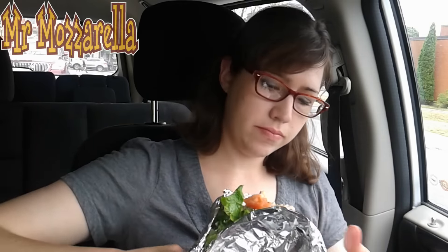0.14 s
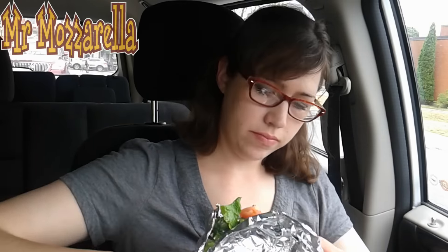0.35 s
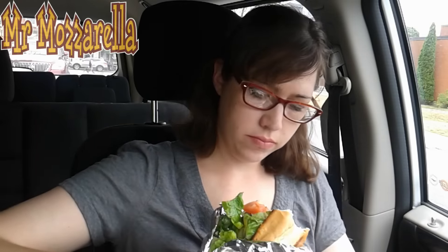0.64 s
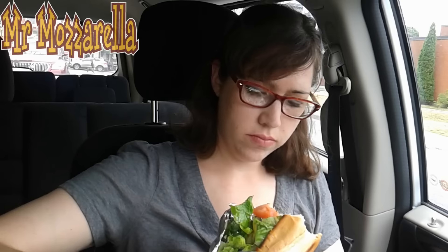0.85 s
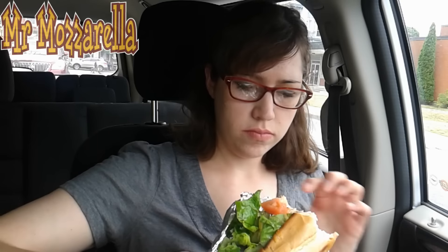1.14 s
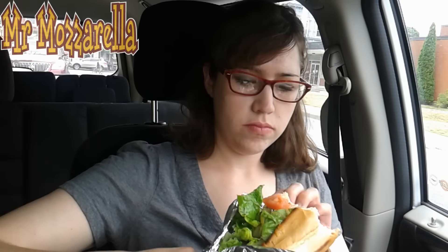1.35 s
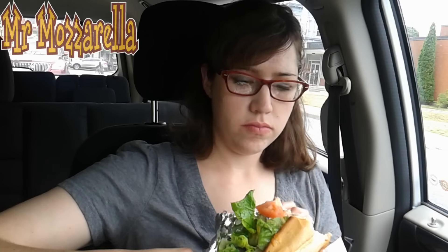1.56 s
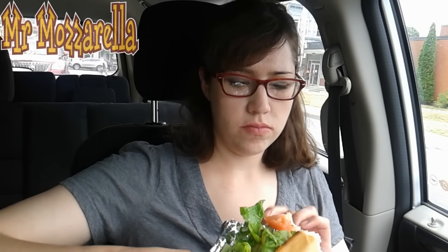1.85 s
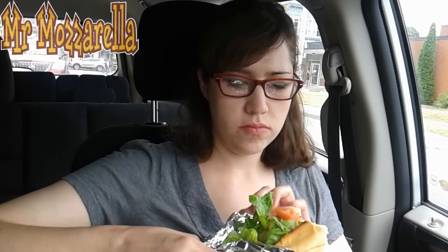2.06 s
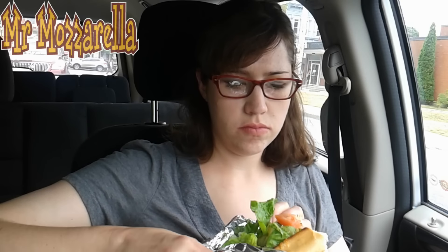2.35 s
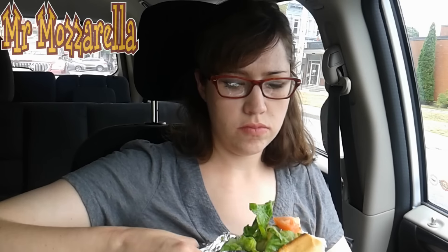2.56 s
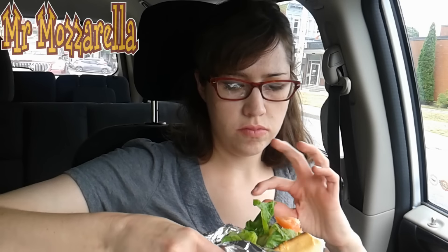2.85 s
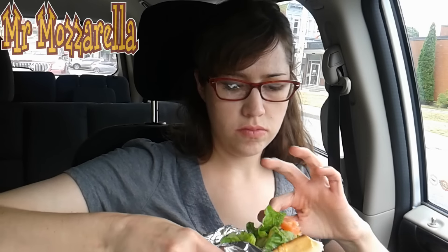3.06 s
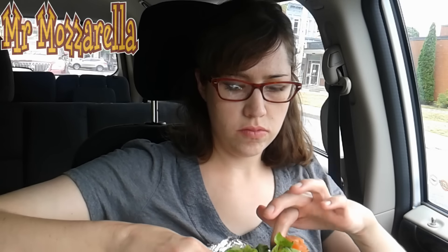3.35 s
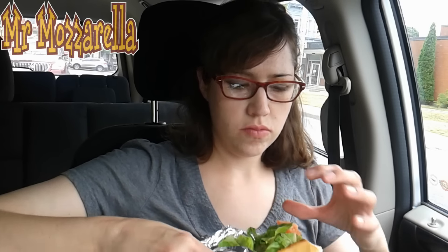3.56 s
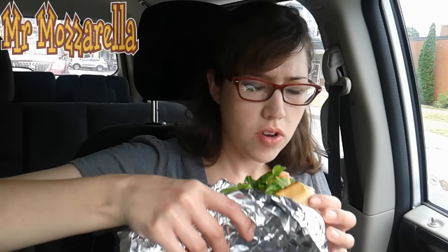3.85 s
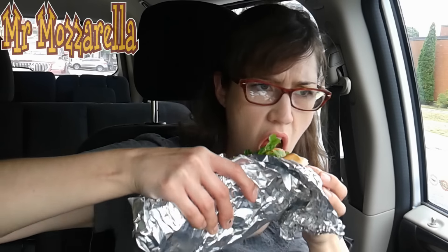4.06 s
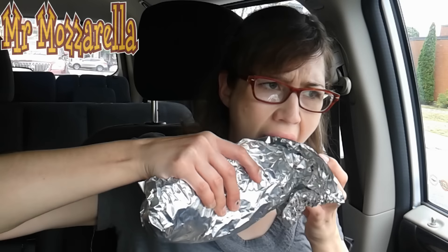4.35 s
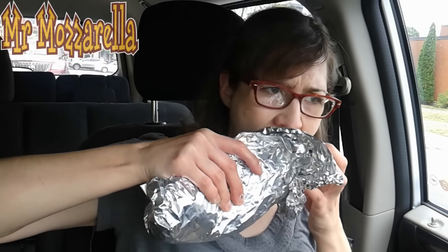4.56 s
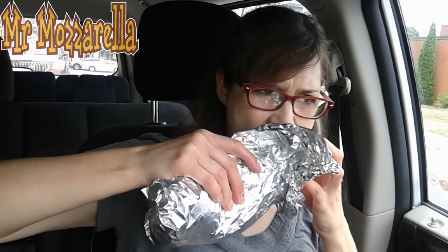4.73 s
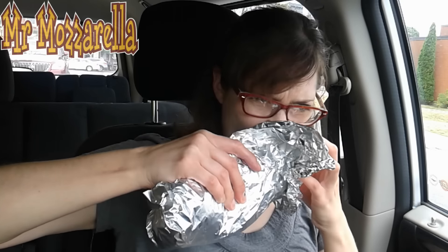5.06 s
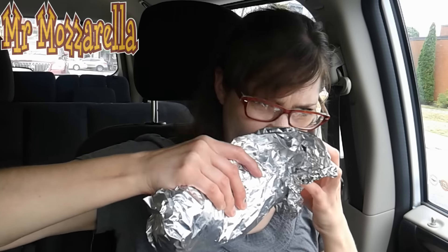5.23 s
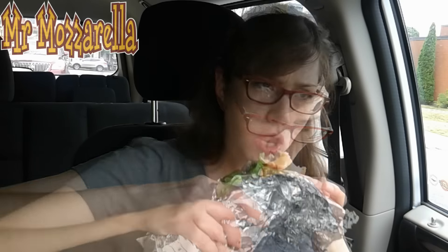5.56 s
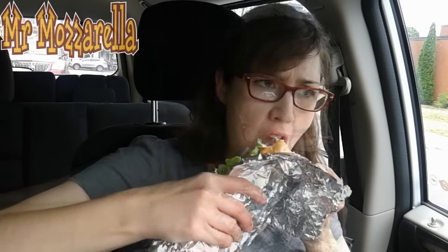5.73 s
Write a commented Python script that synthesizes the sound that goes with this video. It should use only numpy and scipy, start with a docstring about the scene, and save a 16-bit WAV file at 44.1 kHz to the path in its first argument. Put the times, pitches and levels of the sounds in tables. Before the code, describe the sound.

Inside a parked car, hands work foil around a sandwich: dense, bright crackling and sharp snaps with soft bumps for nearly three seconds. A quiet pause with faint ticks follows, then lighter, sparser crinkles. Low rumble and slight hiss continue; an engine hum swells at the very end. Close stereo microphone, short padded cabin tail.

```python
"""A sandwich in aluminium foil is turned and picked at inside a parked car.
From the start, buckling creases radiate swarms of clicks, and snapping facets crack and ring above dull hand bumps.
Near the middle the foil quietens, then finer snaps and grips return; the padded cabin adds a short diffuse tail.
Filtered noise gives a low rumble and faint hiss throughout; a harmonic engine hum swells at the end."""
import sys
import numpy as np
from scipy import signal
from scipy.fft import rfft, irfft
from scipy.io import wavfile
from scipy.ndimage import uniform_filter1d

SR = 44100
rng = np.random.default_rng(int(sys.argv[2]) if len(sys.argv) > 2 else 0)


def persist_wave(psi):
    """Save psi, clipped to +-1, as 16-bit WAV."""
    counts = np.round(np.clip(psi, -1, 1) * 32767).astype(np.int16)
    wavfile.write(sys.argv[1], SR, np.atleast_2d(counts).T)


N = 259969
TIME = np.arange(N) / SR

# radiation spectrum of the crisp foil: (frequency [Hz], relative level per hertz [dB])
FOIL_SPECTRUM = [(880, -39.5), (1500, -9), (1850, -9.5), (2230, -3.5), (2730, -5.5), (3310, -6.5),
                 (4290, 3.5), (5300, -3), (6550, -1.5), (8330, -7), (9540, -12.5), (13900, -11.5),
                 (15000, -114)]
# directivity of the foil, positive to the left: (frequency [Hz], left-right level difference [dB])
SIDE_BALANCE = [(400, 6.5), (1000, -3), (2200, 5), (4200, -9), (6000, 10), (8500, 14.5), (13000, 3)]

# envelope of a finger movement
ATTACK_S, SWELL_DB, RELEASE_DB_PER_S = 0.0096, 3, 547


def from_db(db):
    """Level to amplitude: 20 dB is a factor of ten."""
    return 10 ** (np.asarray(db) / 20)


def rms_one(x):
    """Normalisation of the mean power to 1."""
    return x / np.sqrt(np.mean(x ** 2) + 1e-20)


def in_time(rows):
    """Linear interpolation of each column of a curve at every sample."""
    s, *columns = np.transpose(rows)
    return [np.interp(TIME, s, column) for column in columns]


def at_hz(points, hz):
    """Interpolation of a spectrum on a logarithmic frequency axis."""
    frequencies, levels = np.transpose(points)
    return np.interp(np.log(hz), np.log(frequencies), levels)


def panned(db):
    """Stereo placement by level difference, positive to the left."""
    return from_db(np.array([[db], [-db]]) / 2)


def band(x, low, high):
    """Butterworth band-pass: maximally flat between two frequencies [Hz]."""
    sos = signal.butter(2, [low, min(high, SR / 2 - 100)], "band", fs=SR, output="sos")
    return signal.sosfilt(sos, x + 1e-18)


def drift(rate):
    """Slow random fluctuation of rms 1: noise through two equal low-pass poles at rate [Hz]."""
    step = 20  # samples between computed values
    pole = np.exp(-2 * np.pi * rate * step / SR)
    noise = rng.standard_normal(N // step + 2002)
    slow = signal.lfilter([1], [1, -2 * pole, pole * pole], noise)[2000:]
    return np.interp(np.arange(N) / step, np.arange(len(slow)), rms_one(slow))


def add(out, s, sound):
    """Superposition of a short sound at time s."""
    start = max(0, round(s * SR))
    out[:, start:start + sound.shape[1]] += sound[:, :max(0, N - start)]


def background(alike_below_hz=450, hiss_db=-69):
    """Spectrally shaped noise: rumble from outside, more alike on both sides, and a faint steady hiss."""
    # spectrum of the cabin noise: (frequency [Hz], relative level per hertz [dB])
    cabin_spectrum = [(25, -24), (40, -15.5), (62, 0), (85, -1.5), (125, -10), (180, -9), (370, -18),
                      (800, -22), (2400, -24.5), (4200, -25.5), (8000, -30.5), (14000, -28), (15500, -54.5)]
    # rumble from outside: (time [s], level [dB])
    rumble_level = [(0.0, -58), (2.75, -58.5), (3.05, -64.5), (4.15, -56.5), (4.35, -59.5), (5.89, -53.5)]
    hz = np.maximum(np.arange(N // 2 + 1) * SR / N, 1)
    mid, side = rfft(rng.standard_normal((2, N)))
    high = hz ** 2 / (hz ** 2 + alike_below_hz ** 2)
    stereo = mid + (0.4 + 0.54 * high) * side * [[1], [-1]]
    noise = stereo * from_db(at_hz(cabin_spectrum, hz))
    rumble = from_db(in_time(rumble_level)[0]) * rms_one(irfft(noise * (1 - high), N))
    hiss = from_db(hiss_db) * rms_one(irfft(noise * high, N))
    return rumble + hiss


def engine(waver=.012, throb_db=2.3):
    """A harmonic series: a nearby engine drones through the car body with slightly unsteady pitch and level."""
    # hum before its random waver: (time [s], mean firing rate [Hz], reference level [dB])
    hum = [(0, 62.3, -68), (3.0, 62.77, -68.5), (5.4, 60.97, -60.5), (5.6, 60.9, -54), (5.78, 59.7, -43.5),
           (5.89, 61, -43)]
    # harmonics: (multiple of the firing rate, relative level [dB])
    harmonics = [(1, -4.5), (2, -1.5), (3, -5.5), (4, -10.5), (5, -22), (6, -25)]
    hz, level_db = in_time(hum)
    turn = 2 * np.pi * np.cumsum(hz * (1 + waver * drift(5))) / SR
    tone = np.zeros(N)
    for multiple, db in harmonics:
        start_phase = rng.uniform(0, 2 * np.pi)
        tone += from_db(db + throb_db * drift(7)) * np.sin(round(multiple) * turn + start_phase)
    return panned(0.86) * from_db(level_db) * tone


def pressed(rows):
    """Power summation of overlapping finger movements: quick closing, swelling hold, release."""
    power = np.zeros((len(rows[0]) - 2, N))  # one curve per level column
    t = TIME[:SR // 2]
    for start_s, length_s, *levels_db in rows:
        closing = np.clip(t / ATTACK_S, 0, 1)
        swell_db = SWELL_DB * (np.clip(t / length_s, 0, 1) - .5)
        release_db = RELEASE_DB_PER_S * np.maximum(t - length_s, 0)
        envelope = closing * from_db(swell_db - release_db)
        add(power, start_s, np.outer(from_db(levels_db), envelope) ** 2)
    return np.sqrt(power)


def hands(flex, grip_rub_db=-11, grip_thud_db=-13, bump_db=-3, bump_t60=0.068, bump_rise_s=0.012):
    """Friction noise and damped low tones: hands rub and bump the bread, and every grip jostles it."""
    # fingers sliding over bread and wrapper: (start [s], length [s], level [dB])
    slides = [(0.37, 0.1, -53.5), (2.2, 0.22, -52), (2.42, 0.2, -59), (2.815, 0.082, -53.5),
              (4.0, 0.2, -61.5), (5.475, 0.057, -54.5)]
    # soft bumps on the bundle: (time [s], relative level [dB], frequency [Hz])
    bumps = [(0.014, -28, 211), (0.244, -22.5, 228), (0.752, -32, 263), (0.836, -26, 246),
             (0.978, -20.5, 174), (0.992, -20.5, 182), (1.959, -27, 208), (2.363, -25, 226),
             (2.39, -28, 220), (2.822, -30.5, 330), (4.031, -32.5, 220), (5.493, -29, 250),
             (5.515, -38, 320)]
    mid, side = rng.standard_normal((2, N))
    stereo = mid + .45 * side * np.array([[1], [-1]])
    rubbing = rms_one(band(stereo * from_db(2.5 * drift(25)), 170, 380))
    jostling = rms_one(band(mid, 70, 190))
    rub_gain = pressed(slides) + from_db(grip_rub_db) * flex
    out = rub_gain * rubbing + from_db(grip_thud_db) * flex * jostling
    t = np.arange(SR // 5) / SR
    for s, level_db, hz in bumps:
        decay = from_db(level_db + bump_db - 60 * t / bump_t60)
        bump = np.sin(2 * np.pi * hz * t) * (1 - np.exp(-t / bump_rise_s)) * decay
        add(out, s, panned(1.2) * bump)
    return out


def reflections(t60, first_s, shared_hz=700):
    """Diffuse decay as unit-energy noise; long waves reach both sides alike."""
    t = np.arange(SR // 6) / SR
    mid, side = rng.standard_normal((2, len(t)))
    side = signal.sosfilt(signal.butter(1, shared_hz, "high", fs=SR, output="sos"), side)
    onset = np.clip(t / first_s - .5, 0, 1)
    tail = (mid + side * np.array([[1], [-1]])) * from_db(-60 * t / t60) * onset
    return tail / np.sqrt(np.sum(tail ** 2, axis=1, keepdims=True))


def cabin(x, t60=0.053, wet_db=0.0, first_s=0.00096, count=7):
    """Reverberation by convolution: windows and roof reflect densely, and the seats soon absorb it."""
    wet = 0
    spot = TIME / .008  # the sounding spot moves on every 8 ms
    for k in range(count):
        # successive clicks come from different spots on the sheet, each with its own reflections
        share = np.clip(1 - np.abs((spot - k + 1) % count - 1), 0, 1)
        from_spot = x * np.sin(np.pi / 2 * share)
        wet = wet + signal.oaconvolve(from_spot, reflections(t60, first_s), axes=1)[:, :N]
    return (x + from_db(wet_db) * wet) / np.sqrt(1 + from_db(2 * wet_db))


def aimed(x, treble_hz=8000):
    """Directivity: the highest sounds beam, so turning the bundle alters their level and shifts the sound."""
    # how the bundle is held: (time [s], top-treble gain [dB], left-right level difference [dB])
    aim = [(0.1, -0.5, -1), (0.7, -2.5, 0.5), (1.5, 1, 0.5), (2.1, -4.5, -1), (2.7, 3, -0.5),
           (3.5, 4, -1.5), (4.3, -9.5, -1), (4.8, 1, -2), (5.8, -9.5, -0.5)]
    treble_db, pan_db = in_time(aim)
    dull = signal.sosfilt(signal.butter(1, treble_hz, fs=SR, output="sos"), x)
    brightened = dull + from_db(treble_db) * (x - dull)
    return brightened * from_db(pan_db * np.array([[.5], [-.5]]))


def creases(per_s, spread_db, clump_db):
    """Avalanche statistics: random buckling clicks of uneven size, evened to about rms 1 over 36 ms."""
    born = rng.random(N) < per_s / SR
    sizes = from_db(spread_db * np.minimum(rng.exponential(1, N), 4) + clump_db * drift(47))
    clicks = born * sizes * rng.choice([-1, 1], N)
    local_power = np.maximum(uniform_filter1d(clicks ** 2, size=1600), 0)
    return clicks / np.sqrt(local_power + 1e-4)


def radiate(clicks, spectrum, edges, alike, vary_db):
    """Modal excitation: every click drives each band of the sheet differently and towards each side."""
    at = np.flatnonzero(clicks)
    alike = np.clip(alike, 0, 1)  # correlation of left and right
    out, power = np.zeros((2, N)), 0
    for low, high in zip(edges, edges[1:]):
        hz = np.sqrt(low * high)
        mid, side, size = rng.standard_normal((3, N), dtype=np.float32)[:, at]
        stereo = np.sqrt(1 + alike) * mid + np.sqrt(1 - alike) * side * [[1], [-1]]
        drive = np.zeros((2, N))
        drive[:, at] = clicks[at] * from_db(vary_db * size) * stereo
        gain = from_db(at_hz(spectrum, hz)) * np.sqrt(high - low)
        out += gain * panned(at_hz(SIDE_BALANCE, hz)) * rms_one(band(drive, low, high))
        power += gain ** 2
    return out / np.sqrt(power)


def tinkle(per_s=110, t60=0.0076, spread_db=6.0, pan_spread_db=2.5, lift_db=7.0):
    """Free decay of small resonators: facets each ring at a pitch of their own; overall rms 1."""
    out, t = np.zeros((2, N)), np.arange(SR // 50) / SR
    slot = 40  # samples in which at most one facet rings
    chance, pitch, size, side, phase = rng.random((5, N // slot))
    for k in np.flatnonzero(chance < per_s * slot / SR):
        hz = 2600 * 5 ** pitch[k]
        level_db = at_hz(FOIL_SPECTRUM, hz) + lift_db * pitch[k] - spread_db * np.log(size[k] + 0.062)
        # a different phase at each side
        tone = np.sin(2 * np.pi * (hz * t + np.array([[0], [phase[k]]])))
        ring = tone * (1 - np.exp(-t / .0002)) * from_db(level_db - 60 * t / t60)
        pan_db = at_hz(SIDE_BALANCE, hz) + pan_spread_db * (2 * side[k] - 1)
        add(out, k * slot / SR, panned(pan_db) * ring)
    return rms_one(out)


def crackle(fine, flex, fine_db=0.5, per_s=900, rate_growth=.45, clicks_db=-2.5, tinkle_db=-8.5):
    """Buckling instability: a harder squeeze buckles more creases per second, and louder ones."""
    # spectrum of the flexing sheet: (frequency [Hz], relative level per hertz [dB])
    sheet_spectrum = [(370, -4.5), (450, -7.5), (540, 7.5), (630, 5.5), (760, -6), (1000, -2.5), (1400, 4),
                      (1800, -14), (2400, -1), (3300, 3.5)]
    # the foil ticks faintly even while it is only held
    held_crackle_db, held_flex_db = -73.5, -81
    fine = from_db(fine_db) * fine + from_db(held_crackle_db)
    flex = flex + from_db(held_flex_db)
    # per_s is the click rate at a drive of -40 dB
    rate = per_s * (fine / from_db(-40)) ** rate_growth
    clicks = creases(rate, spread_db=3.0, clump_db=2.0)
    treble_edges, low_edges = np.geomspace(1300, 14900, 20), np.geomspace(360, 3400, 16)
    treble = radiate(clicks, FOIL_SPECTRUM, treble_edges, alike=0.017, vary_db=3.0)
    body = radiate(clicks, sheet_spectrum, low_edges, alike=0.26, vary_db=4.0)
    return fine * (from_db(clicks_db) * treble + from_db(tinkle_db) * tinkle()) + flex * body


def snaps(ring_t60=.015, overtone=1.72, overtone_db=-15, ring_db=-5, ear_phase=1.36, wobble=0.046,
          flip_db=-15.0, flip_s=0.00012, crack_db=-3, crack_t60=0.0082, spike_db=3, spike_t60=0.0025,
          run_db=-10, run_lumps_db=5.0, rise_share=0.069, skirt=0.68, top_db=-15, mid_db=-13, low_db=-19):
    """Snap-through: a facet flips with a crack, rings and sets off smaller clicks; longer runs rise slower."""
    # facets snapping over: (time [s], relative level [dB], mean ring frequency [Hz],
    # ring level offset [dB], decay time constant of the run of clicks [s])
    facets = [(0.0856, -9.5, 3850, -9, 0.014), (0.19, -12, 6760, 1.5, 0.0047),
              (0.2446, -13.5, 6230, 6.5, 0.01), (0.2484, -3.5, 3370, -7, 0.0074),
              (0.37, -13.5, 6970, 7, 0.0042), (0.3811, -15.5, 5830, 10, 0.0033),
              (0.404, -13.5, 4420, 6, 0.031), (0.4913, -16, 6840, 10, 0.041),
              (0.5383, -10.5, 6650, 5, 0.012), (0.563, -11, 6650, 6, 0.012),
              (0.613, -11.5, 6100, -2, 0.0035), (0.671, -14, 4770, -21, .011),
              (0.683, -4, 4370, -1.5, 0.009), (0.7084, -9.5, 6900, 2, .013), (0.7224, -21, 4330, -4, 0.014),
              (0.8491, -10.5, 6800, -11, 0.014), (0.9147, -24, 7800, 5, 0.0088),
              (0.952, -16, 5600, -6, .011), (1.1201, -26.5, 6400, -5, 0.012),
              (1.258, -42.5, 6030, -2, .008), (1.3897, -29, 5770, 4, 0.022),
              (1.4139, -26, 5000, -13, 0.011), (1.5822, -14.5, 6040, 1, 0.013),
              (1.5988, -21, 6770, 8.5, 0.035), (1.717, -18.5, 6130, 12.5, 0.0052),
              (1.7542, -12.5, 4800, -1, 0.016), (1.829, -6.5, 4730, -13, .011),
              (1.891, -37, 4400, 27.5, .01), (1.957, -7, 4190, -5, 0.0039), (2.0716, -40, 5300, 3, .006),
              (2.149, -16.5, 4880, -15, 0.0065), (2.2055, -18, 4470, -12, .015),
              (2.257, -23, 8100, 11.5, 0.0059), (2.319, -32, 7100, -11, .018),
              (2.3584, -18, 4260, -27, 0.0054), (2.578, -11, 4640, -2, 0.0048),
              (2.7085, -18, 4400, -9, 0.011), (2.9069, -44, 4940, 9.5, 0.016),
              (3.133, -46.5, 4470, -4, 0.0064), (3.2117, -33.5, 6050, 4.5, 0.0061),
              (3.232, -39, 5650, 3, 0.013), (3.32, -43.5, 4000, 10, 0.018), (3.3711, -31.5, 5830, 0, 0.014),
              (3.404, -37.5, 6600, 8.5, 0.01), (3.5174, -27, 4350, 11, 0.0034),
              (3.859, -43, 4870, 10, .011), (3.9873, -25, 4700, 3, 0.011), (4.116, -29.5, 3420, -14, 0.014),
              (4.152, -16, 4150, 3.5, 0.01), (4.2089, -19.5, 3710, 0.5, 0.0035),
              (4.346, -20, 4530, 5, .012), (4.3775, -24, 6940, 2, 0.007), (4.403, -31, 6400, -16, 0.0087),
              (4.4612, -36.5, 10000, 0, 0.0064), (4.4805, -34, 6900, -5, .007),
              (4.501, -27, 5260, -17, 0.0044), (4.521, -28, 6700, -15, 0.0074),
              (4.5715, -25.5, 4000, 0, 0.0064), (4.6028, -27, 7500, -15, 0.0059),
              (4.7304, -23, 4120, -12, 0.013), (4.7684, -14, 5170, -6, 0.0071), (4.812, -23, 6600, 5, 0.01),
              (4.8463, -17.5, 4460, 4, 0.004), (4.9122, -23, 7380, 4.5, 0.0025),
              (4.9769, -9, 5300, -24, 0.0042), (5.003, -23, 6600, -12, 0.0051),
              (5.051, -20, 4900, -2, 0.012), (5.1207, -30, 3730, 5, 0.022), (5.1515, -26, 7250, 0, 0.0045),
              (5.384, -26.5, 4910, -12, 0.0094), (5.4208, -23, 5550, -26, 0.0059),
              (5.5165, -36, 7200, -10, 0.0085), (5.63, -37, 4190, 10, 0.014), (5.685, -38, 3400, 6, 0.016)]
    # higher facets sound further to the left
    centred_hz, left_db_per_octave = 3450, 10
    out, t = np.zeros((2, N)), np.arange(SR // 12) / SR
    phase = np.array([[0], [ear_phase]])
    for s, level_db, hz, ping_db, run_s in facets:
        pan_db = left_db_per_octave * np.log2(hz / centred_hz)
        white = rng.choice([-1, 1], (2, 2, len(t)))
        # random values held for 30 samples each
        lumps, bend = np.repeat(rng.standard_normal((2, len(t))), 30, axis=1)[:, :len(t)]

        # the facet is still settling while it rings, so its pitch wobbles
        turn = 2 * np.pi * np.cumsum(hz * (1 + wobble * bend)) / SR
        ring = np.sin(turn - phase) + from_db(overtone_db) * np.sin(overtone * turn + phase)
        ring *= from_db(ring_db + ping_db - 60 * t / ring_t60) * (1 - np.exp(-t / 0.0001))
        # the flip itself is a pulse only a few cycles long
        flip_shape = (t / flip_s) * np.exp(1 - t / flip_s)
        ring += from_db(flip_db) * np.sin(turn - phase) * flip_shape

        run = from_db(run_db + run_lumps_db * np.minimum(lumps, 1.5)) * np.exp(-t / max(run_s, .001))
        spike = from_db(spike_db - 60 * t / spike_t60)
        crack_decay = from_db(crack_db - 60 * t / crack_t60)
        rise = 1 - np.exp(-t / max(rise_share * run_s, .0001))
        own, wide = white * rise * (spike + crack_decay + run)

        # a band around the facet's own pitch with wide skirts; the whole sheet radiates a little body
        crack = band(own, hz * 0.76, hz * 1.48) + skirt * band(wide, 3300, 9420)
        crack += from_db(top_db) * band(own, 12000, 14200)
        body = from_db(mid_db) * band(wide, 2600, 2700) + from_db(low_db) * band(wide, 640, 1300)
        add(out, s, from_db(level_db) * (panned(pan_db) * (ring + crack) + panned(-3.5) * body))
    return out


def scene():
    """Superposition of the reverberant foil, the hands, the background and the engine."""
    # fingers gripping and crushing the foil: (start [s], length [s],
    # relative drive of the fine crackle [dB], drive of the flexing sheet [dB])
    grips = [(0.0, 0.052, -24.5, -41.5), (0.06, .27, -42.5, -51), (0.24, 0.013, -31, -45),
             (0.335, 0.2, -33, -52.5), (0.555, 0.26, -21.5, -41), (0.598, 0.021, -21, -53),
             (0.693, 0.015, -27.5, -35), (0.81, 0.13, -31.5, -44.5), (0.955, 0.032, -22.5, -36),
             (1.05, .09, -62.5, -66.5), (1.15, 0.022, -46.5, -64), (1.34, 0.099, -52.5, -58.5),
             (1.41, .3, -31.5, -48.5), (1.462, 0.011, -31.5, -43), (1.63, .025, -34, -41.5),
             (1.72, .16, -38.5, -49), (1.845, 0.016, -39, -65), (1.925, 0.023, -36, -44.5),
             (1.953, 0.0092, -32.5, -36.5), (2.141, 0.037, -41.5, -53.5), (2.19, 0.08, -30, -41.5),
             (2.32, 0.036, -36, -49), (2.39, 0.16, -45, -54), (2.425, .06, -38, -52.5),
             (2.585, 0.09, -30, -49), (2.71, 0.05, -30, -40), (3.782, 0.014, -51.5, -68),
             (3.805, 0.0116, -41, -49.5), (3.965, 0.012, -54, -65), (4.0, 0.079, -44.5, -57.5),
             (4.1, 0.124, -55, -58), (4.29, 0.028, -56, -69), (4.47, 0.27, -48.5, -61.5),
             (4.62, 0.023, -31.5, -42), (4.75, 0.3, -41.5, -56), (4.825, 0.018, -34.5, -42.5),
             (5.06, 0.11, -50.5, -59), (5.22, .13, -56, -64), (5.3, 0.023, -47.5, -59),
             (5.47, 0.19, -58.5, -67.5), (5.63, 0.25, -52, -63)]
    fine, flex = pressed(grips)
    foil = cabin(aimed(crackle(fine, flex) + snaps()))
    return foil + hands(flex) + background() + engine()


def record(dry):
    """Soft saturation rounds the highest peaks; an elliptic low-pass cuts steeply above 15.5 kHz."""
    rounded = .7 * np.tanh(dry / .7)
    return signal.sosfilt(signal.ellip(10, .1, 80, 15500, fs=SR, output="sos"), rounded)


dry = scene()
out = record(dry)
persist_wave(out)
```